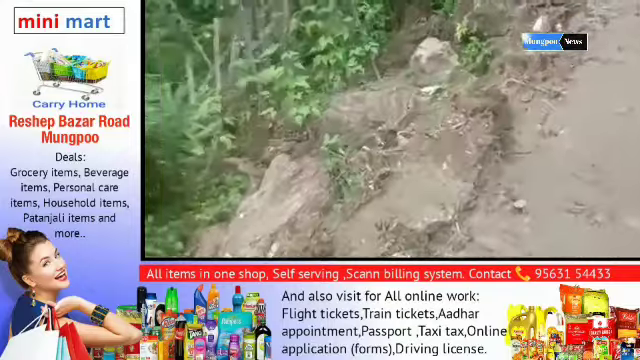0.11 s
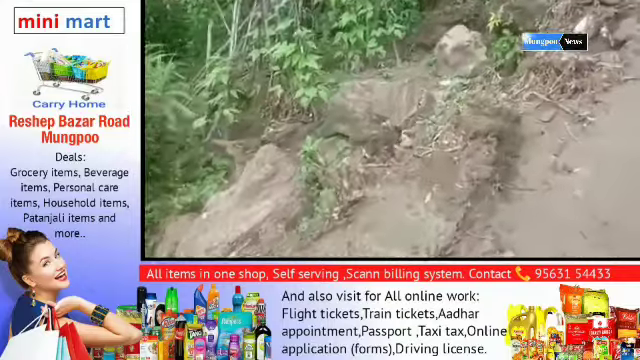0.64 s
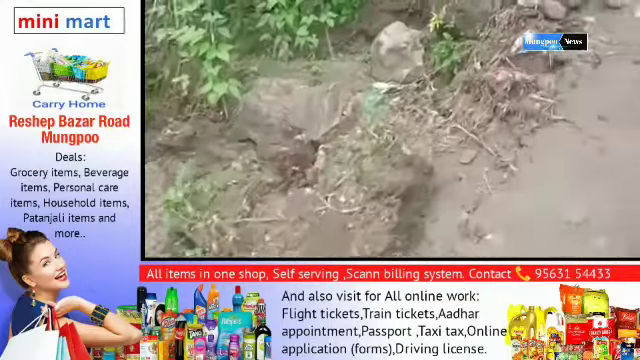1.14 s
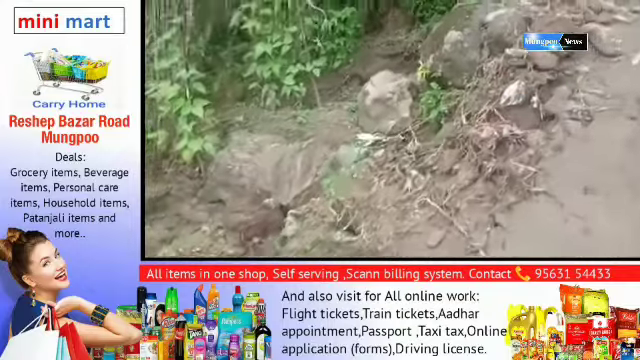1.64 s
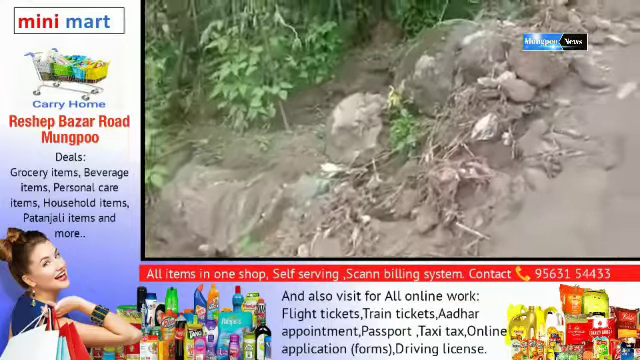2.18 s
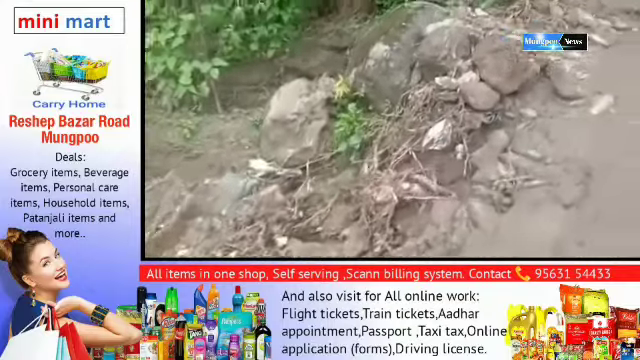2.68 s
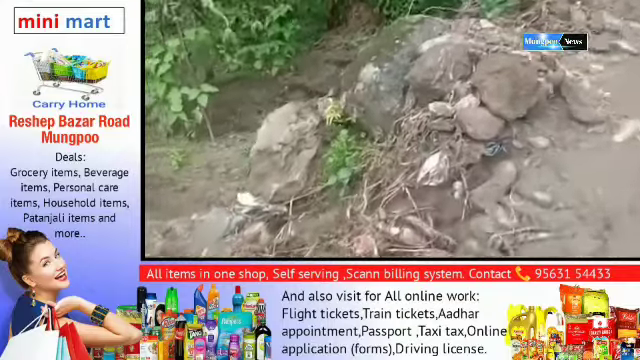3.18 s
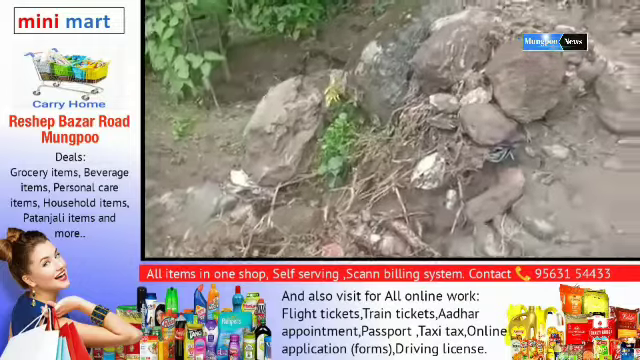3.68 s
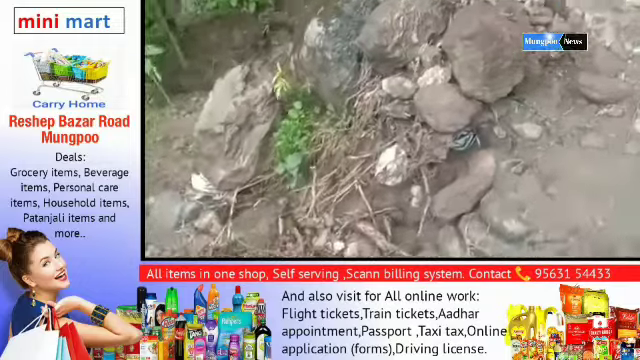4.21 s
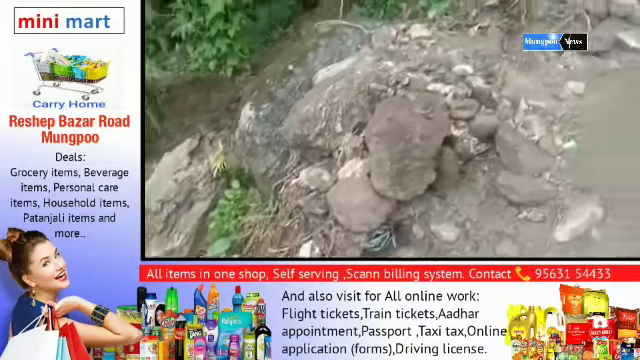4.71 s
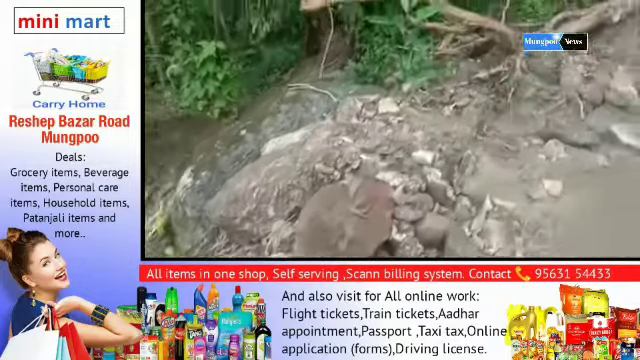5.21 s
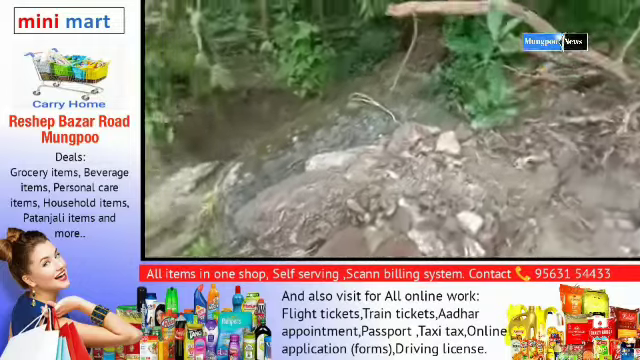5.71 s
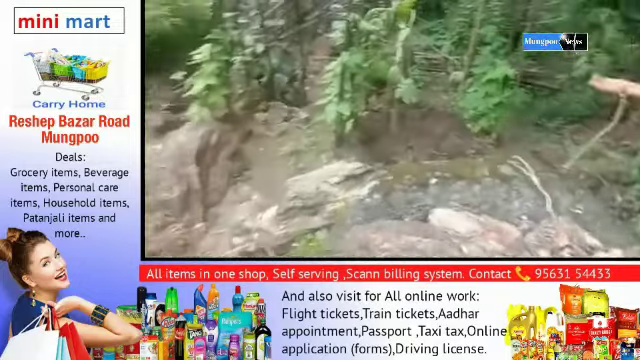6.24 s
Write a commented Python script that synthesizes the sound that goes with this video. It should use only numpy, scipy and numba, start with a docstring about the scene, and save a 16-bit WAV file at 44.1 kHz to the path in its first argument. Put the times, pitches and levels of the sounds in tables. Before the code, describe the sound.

Someone walks with a phone beside rushing water. The stream is a dense, continuous wash with faint flickering spray, slowly rising in level. Footfalls reach the microphone as muffled knocks through hand and case, heaviest just before three seconds, then sparser and weaker. Small squelches and gritty scrapes follow. Low, irregular wind buffets rumble underneath, becoming stronger from the middle onward. The image is almost mono.

```python
"""Muddy path above a stream

A walker with a phone in hand follows a muddy path above a rushing stream that slowly grows louder.
The water is filtered noise, a broad hiss with flickering spray; light wind rumbles on the microphone
as low noise with bell-shaped buffets. Footfalls are jolts that excite resonances of case and arm;
scuffs of mud and grit are brief swells of band noise."""
import sys
import numpy as np
from scipy import signal
from scipy.fft import rfft, irfft
from scipy.io import wavfile
from scipy.ndimage import uniform_filter1d
from numba import njit

SR = 44100
rng = np.random.default_rng(int(sys.argv[2]) if len(sys.argv) > 2 else 0)


def store_pcm(level_fs):
    """Save levels as 16-bit WAV."""
    pcm = np.round(np.clip(level_fs, -1, 1) * 32767).astype(np.int16)
    wavfile.write(sys.argv[1], SR, np.atleast_2d(pcm).T)


def gain_from_db(level_db):
    """Turn a decibel level (scalar or array-like) into a linear amplitude factor."""
    decades = np.asarray(level_db, float) / 20
    return 10 ** decades


N = 280476  # samples

# relative spectrum of the rushing water: f/Hz, density level/dB
WATER_SPECTRUM = [(200, -18.5), (700, -7.5), (1100, -8), (1600, -6), (3000, -8), (4300, -11.5), (5400, -11),
                  (7100, -18.5), (8100, -23.5), (9600, -20), (12000, -33), (14000, -57)]
# relative spectrum of the fine spray: f/Hz, density level/dB
SPRAY_SPECTRUM = [(9000, -32), (12000, -10), (13700, -6), (15000, 4), (17000, -3.5)]


@njit
def svf(x, hz, width):
    """State-variable filter: two integrators in a loop give band-pass (peak gain 1) and high-pass."""
    band, high = np.empty(len(x)), np.empty(len(x))
    band_state, low_state = 0., 0.
    for i in range(len(x)):
        g = np.tan(np.pi * hz[i] / SR)
        damping = width[i] / hz[i]
        v = (band_state + g * (x[i] - low_state)) / (1 + g * (g + damping))
        low = low_state + g * v
        band_state = 2 * v - band_state
        low_state = 2 * low - low_state
        band[i] = damping * v
        high[i] = x[i] - damping * v - low
    return band, high


def ring(x, hz, width):
    """Simple resonance: a damped oscillator of fixed centre and bandwidth (Hz)."""
    return svf(x, np.full(len(x), float(hz)), np.full(len(x), float(width)))[0]


def unit(x):
    """Normalisation: equal mean power, rms 1."""
    return x / np.sqrt(np.mean(x ** 2))


def curves(table):
    """Linear interpolation: each column of a table becomes a course in time."""
    s, *columns = np.transpose(table)
    return [np.interp(np.arange(N) / SR, s, column) for column in columns]


def noise(spectrum):
    """Spectral shaping: white noise weighted in frequency, then scaled to rms 1."""
    hz, db = np.transpose(spectrum)
    bins = np.arange(1, N // 2 + 2) * SR / N
    gain = gain_from_db(np.interp(np.log(bins), np.log(hz), db))
    return unit(irfft(rfft(rng.standard_normal(N)) * gain, N))


def walk(rate):
    """Slow random modulation: levels drawn rate times a second, smoothed twice, spread 1."""
    k = int(SR / rate)
    held = np.repeat(rng.standard_normal(N // k + 1), k)
    smooth = uniform_filter1d(uniform_filter1d(held, k), k)
    return unit(smooth[:N])


def patchy(x, patchy_db, bins, frames):
    """Time-frequency modulation: small patches of pitch and time swell and sink on their own."""
    spec = signal.stft(x, nperseg=1024)[2]
    field = rng.standard_normal(spec.shape)
    for size, axis in ((bins, 0), (frames, 1)):
        field = uniform_filter1d(field, size, axis=axis)
        field = uniform_filter1d(field, size, axis=axis)
    return signal.istft(spec * gain_from_db(patchy_db * unit(field)), nperseg=1024)[1][:N]


def swell(s, half_s):
    """Gaussian envelope: a bell of peak 1 at s with standard deviation half_s (seconds)."""
    return np.exp(-.5 * ((np.arange(N) / SR - s) / half_s) ** 2)


def stream():
    """Superposition: countless splashes merge to noise; gurgles come and go, the spray flickers."""
    # the stream heard along the path: t/s, rush level/dB, spray level/dB,
    # moving lower edge of the rush, high-pass f/Hz
    flow = [(0, -27.5, -57, 670), (.6, -27.5, -57, 640), (1.1, -26.5, -54, 604), (1.6, -26.5, -54, 540),
            (2.5, -26.5, -52, 550), (3.1, -25.5, -52, 534), (3.5, -25, -52, 553), (3.9, -25.5, -52, 690),
            (4.5, -25, -50, 725), (5.1, -24.5, -52, 690), (6, -25, -49, 520), (6.36, -25.5, -52, 524)]
    level_db, spray_db, edge_hz = curves(flow)
    rush = patchy(noise(WATER_SPECTRUM), patchy_db=1.16, bins=3, frames=4)
    for _ in range(3):
        rush = svf(rush, edge_hz, 1.175 * edge_hz)[1]
    rush = unit(rush) * gain_from_db(level_db + 0.31 * walk(7.4))
    spray = noise(SPRAY_SPECTRUM) * gain_from_db(spray_db + 2.0 * walk(16))
    return rush + spray


def wind():
    """Turbulence at the port: large eddies flutter and buffet, small ones rustle, over a low murmur."""
    # slow wind strength: t/s, large-eddy level/dB, small-eddy level/dB
    strength = [(0, -38, -43), (.3, -43.5, -47), (.8, -43.5, -47.5), (1.3, -42, -48.5), (2.2, -44.5, -47.5),
                (2.7, -41, -48.5), (3.0, -40.5, -41.5), (3.4, -35, -45), (3.75, -40, -44),
                (4.4, -39.5, -43.5), (4.9, -37.5, -39.5), (5.4, -37.5, -42), (6.36, -37, -47.5)]
    # strongest buffets of large eddies: t/s, peak level/dB
    buffets = [(.576, -39), (1.057, -37.5), (1.244, -33), (1.475, -33), (1.57, -37), (1.908, -35.5),
               (2.566, -36), (2.95, -28), (3.195, -32), (3.36, -30), (3.96, -32), (4.161, -35),
               (4.315, -31), (4.62, -30.5), (4.84, -28.5), (5.5, -33.5), (5.693, -31), (6.02, -32),
               (6.22, -33)]
    # relative spectrum of large eddies and murmur: f/Hz, density level/dB
    rumble = [(30, -36), (64, -10), (125, -0.5), (215, -1.5), (260, -6.5), (330, -22.5), (600, -64)]
    # relative spectrum of small eddies: f/Hz, density level/dB
    eddies = [(150, -18), (260, -0.5), (400, -1.5), (520, -10.5), (700, -54)]
    buffet_s = 0.021  # standard deviation of a buffet
    flutter_db, flutter_per_s = 2.5, 13  # random unrest of the large eddies
    murmur_db = -51.5

    large_db, small_db = curves(strength)
    power = gain_from_db(large_db + flutter_db * walk(flutter_per_s)) ** 2
    for s, db in buffets:
        power = power + (gain_from_db(db) * swell(s, buffet_s)) ** 2
    large = patchy(noise(rumble), patchy_db=1.5, bins=1, frames=4) * np.sqrt(power)
    small = patchy(noise(eddies), patchy_db=3.0, bins=2, frames=4) * gain_from_db(small_db)
    murmur = gain_from_db(murmur_db) * noise(rumble)
    return large + small + murmur


def steps():
    """Impulse excitation: one jolt or a shudder of several sets the case and the arm ringing."""
    # footfalls, levels before the shudder envelope:
    # t/s, knock level/dB, boom level/dB, shudder length/ms, jolt rate/(1/s)
    footfalls = [(0.0984, -18, -14, 3.6, 70), (0.112, -28, -33, 16, 175), (1.088, -21, -43, 20, 173),
                 (1.1497, -10.5, -16, 2.7, 100), (2.853, -21, -16, 16, 153), (2.867, -21, -7, 23, 130),
                 (2.89, -18, -13.5, 9.4, 285), (3.289, -15.5, -38, 4.6, 100), (4.817, -30, -23, 28, 253)]
    knock, boom = np.zeros(N), np.zeros(N)
    for s, knock_db, boom_db, ms, rate in footfalls:
        if ms * rate > 1000:
            after = (np.arange(12) + .5) / rate
        else:
            after = np.array([.001])  # a single jolt
        # the jolts swell and fade over the shudder
        phase = np.clip(after * 1000 / ms, 0, 1)
        size = np.sqrt(np.sin(3.14 * phase) * (after * 1000 < ms))
        at = ((s + after) * SR).astype(int)
        knock[at] -= size * gain_from_db(knock_db)
        boom[at] -= size * gain_from_db(boom_db)
    push = np.hanning(int(0.0031 * SR))  # soft contact of a sole in mud
    out = 0
    # jolts, centre Hz, width Hz, passes: first the case, then the arm holding it
    for jolts, hz, width, passes in ((knock, 355, 184, 2), (boom, 186, 200, 1)):
        body = np.r_[push, np.zeros(4096)]
        for _ in range(passes):
            body = ring(body, hz, width)
        out = out + signal.fftconvolve(jolts, body / np.abs(body).max())[:N]
    return out


def scuffs():
    """Friction noise: a sole drags and sucks in mud, a swell of wet noise, at times gritty treble."""
    # scuffs and squelches: t/s, length (two standard deviations)/ms, centre f/Hz, width/Hz, level/dB
    drags = [(1.20, 70, 2400, 1400, -30), (3.155, 50, 1750, 350, -31), (3.35, 80, 3000, 140, -32),
             (3.845, 14, 2100, 1100, -23), (4.508, 16, 1500, 2200, -24), (5.235, 25, 1700, 600, -30)]
    # thin high grit under the sole: t/s, length (two standard deviations)/ms, level/dB
    grit = [(4.508, 16, -43), (4.728, 22, -43)]
    wet, thin = noise(WATER_SPECTRUM), noise(SPRAY_SPECTRUM)
    out = np.zeros(N)
    for s, ms, hz, width, db in drags:
        out += swell(s, ms / 2000) * gain_from_db(db) * unit(ring(wet, hz, width))
    for s, ms, db in grit:
        out += thin * swell(s, ms / 2000) * gain_from_db(db)
    return out


def scene():
    """Superposition: nearly mono, with very faint patchy low noise of opposite sign in the channels."""
    # resonances and dips of microphone port and case: f/Hz, width/Hz, gain level/dB
    port = [(1263.4, 64.6, 10.5), (6235, 460, -8), (8000, 790, -7.5)]
    # relative spectrum of the faint side noise: f/Hz, density level/dB
    side_spectrum = [(40, -3), (150, -2), (700, -1), (1100, -6), (2000, -57)]
    air = stream() + scuffs()
    for hz, width, db in port:
        air = air + (gain_from_db(db) - 1) * ring(air, hz, width)
    mid = air + wind() + steps()
    side = gain_from_db(-80) * patchy(noise(side_spectrum), patchy_db=6.0, bins=2, frames=1)
    return np.array([mid + side, mid - side])


def band_limit(x):
    """A steep low-pass at the top of the band."""
    return signal.sosfilt(signal.butter(12, 16780, fs=SR, output="sos"), x)


def record(dry):
    """Band limitation: the phone rolls off the deep bass and cuts the top sharply."""
    low_hz, top_hz = 45.6, 15430
    bass_cut = signal.butter(1, low_hz, "high", fs=SR, output="sos")
    top_cut = signal.ellip(14, .3, 100, top_hz, fs=SR, output="sos")
    cut = signal.sosfiltfilt(bass_cut, dry)  # both directions: no phase shift
    cut = signal.sosfilt(top_cut, cut)
    return band_limit(cut)


dry = scene()
out = record(dry)
store_pcm(out)
```